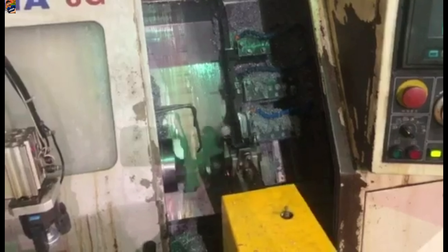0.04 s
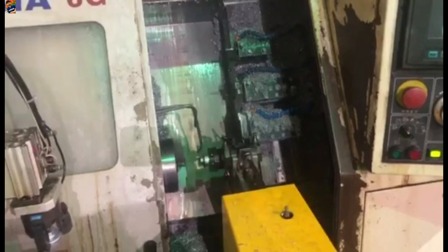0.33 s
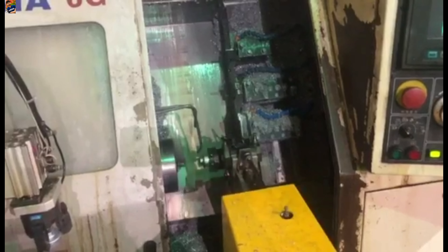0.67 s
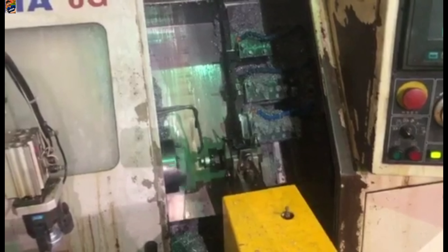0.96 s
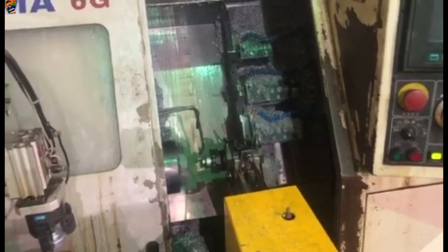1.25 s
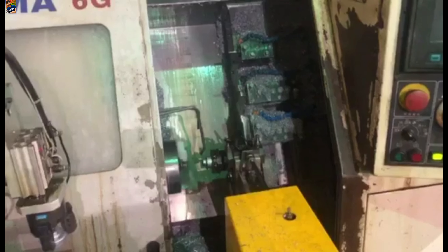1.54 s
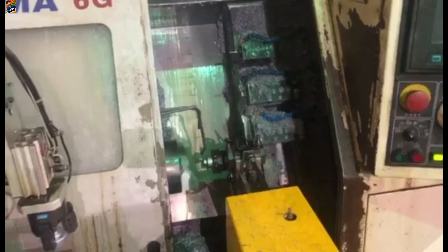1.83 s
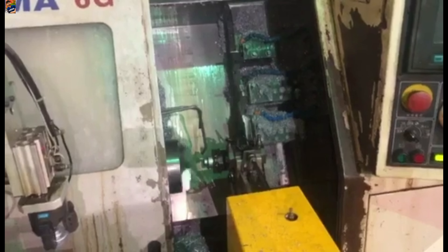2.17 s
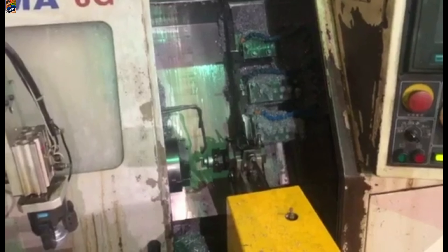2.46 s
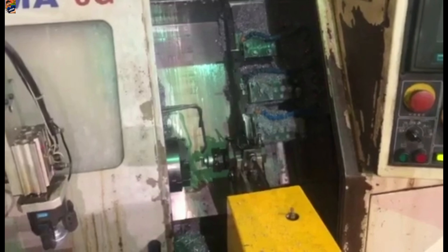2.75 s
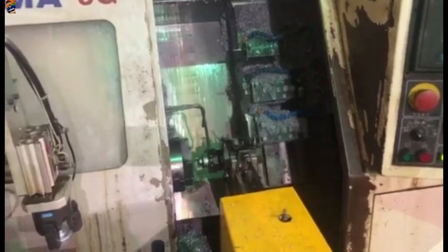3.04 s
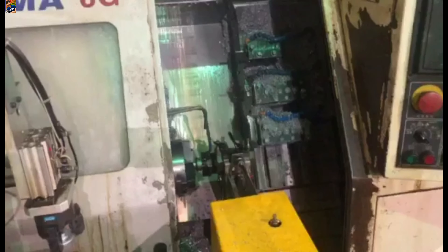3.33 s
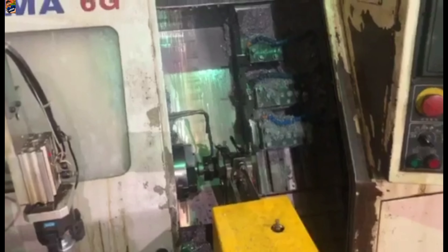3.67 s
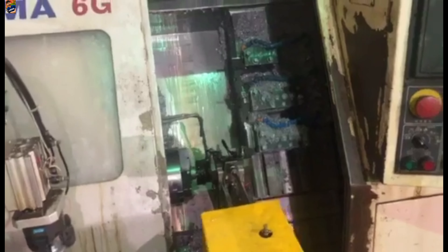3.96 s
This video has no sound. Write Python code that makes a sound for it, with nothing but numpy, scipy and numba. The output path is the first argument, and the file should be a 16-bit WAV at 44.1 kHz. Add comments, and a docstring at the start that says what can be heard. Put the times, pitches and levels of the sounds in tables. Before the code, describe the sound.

A loud, close hiss of air and coolant sprays a spinning lathe chuck, fluttering rapidly over a faint drone. At about 2.2 seconds it cuts off, with a high nozzle whistle fading within half a second. Much quieter motor hum, whine and workshop rush remain, slowly swelling. From about 3 seconds a low rumble grows with a few dull bumps, the strongest near 3.4, continuing until 4 seconds.

```python
"""A jet of air and coolant hisses against the turning chuck of a lathe, fluttering as the jaws pass
and ringing the steel cabin. The valve shuts: the hiss dies away in the workshop, and the nozzle
whistles briefly as the hose empties. Motor hum and drive whine remain, and swell as the automatic
gain control recovers. Near the end a low rumble grows, with a few dull bumps inside the machine."""
import sys
import numpy as np
from scipy import signal
from scipy.fft import rfft, irfft
from scipy.io import wavfile
from scipy.ndimage import uniform_filter1d, map_coordinates
from numba import njit

SR = 44100
rng = np.random.default_rng(int(sys.argv[2]) if len(sys.argv) > 2 else 0)


def bounce(signal):
    """Save signal as a 16-bit WAV file at the path given by the first command-line argument."""
    frames = np.transpose(np.atleast_2d(signal))
    limited = np.clip(frames, -1, 1)
    pcm = np.round(limited * 32767).astype(np.int16)
    wavfile.write(sys.argv[1], SR, pcm)


N = 176400
SHUT_S, SHUT_FALL_S = 2.226, .014  # when the valve shuts, and how fast the flow falls


def undb(db):
    """Turn decibels into a factor to multiply by."""
    return 10 ** (np.asarray(db) / 20)


def level(x, db=0):
    """Scale a signal to an average (rms) level."""
    return x * undb(db) / np.sqrt(np.mean(x ** 2))


def on_log_axis(points, hz):
    """Read between (f/Hz, value) points, giving each octave equal room."""
    freqs, values = np.array(points, float).T
    return np.interp(np.log(hz + 1e-3), np.log(freqs), values)


def bins():
    """The frequencies in the spectrum of the whole sound."""
    return np.arange(N // 2 + 1) * SR / N


def noise(colour):
    """Noise of strength 1; its colour says how strong each frequency is next to the others."""
    spectrum = rfft(rng.standard_normal(N))
    return level(irfft(spectrum * undb(on_log_axis(colour, bins())), N))


def walk(rate):
    """A smooth random wobble of strength 1, changing about rate times a second."""
    spectrum = rfft(rng.standard_normal(N))
    return level(irfft(spectrum / (1 + (bins() / rate) ** 4), N))


def tone(hz):
    """A sine wave that follows a changing pitch."""
    return np.sin(2 * np.pi * np.cumsum(hz) / SR)


def shop_noise():
    """Machinery fills the workshop with a soft, nearly steady rush."""
    # colour of the rush: f/Hz, level/dB
    colour = [(20, -47), (40, -23), (62, -7), (80, -12), (120, -9.5), (190, -7), (260, -7.5), (350, -7.5),
              (470, -5.5), (770, -8.5), (900, -12), (1320, -10), (2440, -16.5), (3600, -16.5), (5200, -19),
              (8600, -17), (9400, -25.5)]
    return undb(-38 + .5 * walk(10)) * noise(colour)


def motor_hum():
    """The motor hums and the drive whines, wavering in pitch and loudness."""
    # motor and drive tones: f/Hz, relative level/dB, flutter/dB
    tones = [(100, -59.5, 1.5), (265, -51, 3), (533, -53.5, 2.5), (592.7, -52.5, 3.5), (791, -56, 3),
             (1071, -64, 2), (1333, -57.5, 1.5), (1610, -63, 1.5), (1840, -69.5, 1), (1980, -67, 2),
             (2110, -60.5, 2), (2640, -58.5, 1), (2670, -54.5, 1), (2977, -64, 2.5), (3688, -61, 1),
             (4544, -58, 1.7)]
    out = 0
    for hz, db, flutter_db in tones:
        drift_hz = 2.98 + 0.002014 * hz  # higher tones wander further
        wave = tone(hz + drift_hz * walk(11.13))
        waver_db = flutter_db * walk(30) + .8 * walk(4)
        out = out + level(wave * undb(waver_db), db + 2)
    return out


def rumble(t):
    """The machine's low rumble swells near the end."""
    # loudness of the rumble: t/s, level/dB
    loudness = [(0, -64), (2.8, -59), (3.15, -54), (3.35, -41), (3.55, -49), (4, -42)]
    # colour of the rumble: f/Hz, level/dB
    colour = [(35, -25.5), (70, -12), (102, 1.5), (170, -7.5), (255, -1.5), (340, -2), (520, -3.5),
              (900, -24.5), (2500, -39.5)]
    times, levels_db = np.array(loudness).T
    return undb(np.interp(t, times, levels_db)) * noise(colour)


def bumps(t):
    """Soft knocks make the housing boom: each swells quickly and dies away."""
    # knocks inside the machine: t/s, f/Hz, level/dB
    knocks = [(3.05, 58, -51), (3.355, 251.5, -41), (3.75, 70.8, -57)]
    rise_s, pitch_wobble = 0.03, 0.0515
    out = 0
    for start, hz, db in knocks:
        age = np.maximum(t - start, 0) / rise_s
        wave = tone(hz * (1 + pitch_wobble * walk(39)))
        boom = level(wave * undb(2 * walk(50)), db)
        out = out + age * np.exp(1 - age) * boom
    return out


def pressure(t):
    """Full flow, then a quick cut when the valve shuts."""
    return np.exp(-np.maximum(t - SHUT_S, 0) / SHUT_FALL_S)


def feed_line(t):
    """The feed line drones for as long as the valve is open."""
    # colour of the drone: f/Hz, level/dB
    colour = [(90, -34), (130, -7.5), (155, 0.5), (180, -5), (230, -19), (297, 0), (345, -15), (390, -4),
              (600, -36)]
    return undb(-42.5) * pressure(t) * noise(colour)


def workshop_echo(x, t):
    """The room answers with a smooth echo whose treble dies first."""
    # time the echo takes to fade by 60 dB: f/Hz, t/s
    fade_times = [(200, 1), (1500, 1), (3500, 0.72), (8000, 0.45)]
    echo_db, delay_s = -11, 0.0091
    octaves_hz = 125 * 2 ** np.arange(8)
    spectrum, tail = rfft(rng.standard_normal(N)), 0
    for hz, share in zip(octaves_hz, np.eye(len(octaves_hz))):
        one_octave = on_log_axis(list(zip(octaves_hz, share)), bins())
        band = irfft(spectrum * one_octave, N)
        tail = tail + band * undb(-60 * t / on_log_axis(fade_times, hz))
    tail = tail * (t > delay_s)
    return undb(echo_db) * signal.fftconvolve(x, tail / np.linalg.norm(tail))[:N]


def cabin(x):
    """The steel cabin rings, lifting some narrow bands of the hiss and lowering others."""
    # the cabin's peaks and dips: f/Hz, width/Hz, lift/dB
    resonances = [(680, 60, -2.5), (1000, 48, 1), (1095, 40, 3.5), (1156, 45, -3), (1670, 150, 2.5),
                  (1910, 83, -3.5), (2020, 35, 0), (2084, 49, 4), (2445, 45, -1.5), (2503, 32, 3.5),
                  (2590, 70, -4), (2690, 47, 2.5), (2861, 22, -1), (3390, 35, -5), (3420, 39, 2.5),
                  (3480, 60, 2), (3625, 50, 0.5), (3940, 42, 3), (3900, 50, 0.5), (4340, 55, 4),
                  (4860, 50, 1), (4954, 64, -9.5), (4930, 61, 2.5), (6900, 130, 1), (7860, 80, 4.5),
                  (7950, 91, 2)]
    lift_db = sum(db / (1 + (2 * (bins() - hz) / width) ** 2) for hz, width, db in resonances)
    return irfft(rfft(x) * undb(lift_db), N)


def nozzle_whistle(t):
    """At low pressure the nozzle sings in unsteady tones, which fade as the hose empties."""
    # the nozzle's tones: f/Hz, pitch wobble/Hz, level/dB
    tones = [(4400, 26.3, -36), (4466, 20, -38), (5220, 14.6, -40), (5200, 16, -35.5), (8765, 25.2, -41.5)]
    rise_s, hold_s, fade_db_per_s, flutter_db = .012, 0.085, 51, 2.2
    since_shut = t - SHUT_S
    rise = np.clip(since_shut / rise_s, 0, 1)
    fade = undb(-fade_db_per_s * np.maximum(since_shut - hold_s, 0))
    out = 0
    for hz, wobble_hz, db in tones:
        wave = tone(hz + wobble_hz * walk(142))
        out = out + level(wave * undb(flutter_db * walk(60)), db)
    return rise * fade * out


def emptying_hose(t):
    """What is left in the hose escapes with a duller, fading hiss."""
    # colour of the last hiss: f/Hz, level/dB
    colour = [(400, -12), (950, -17), (1300, -1.5), (1650, -5.5), (2200, -4.5), (2700, -7), (3500, -11),
              (5000, -4.5), (6000, -20), (7000, -13), (9000, -25)]
    start_db, fade_db_per_s = -23, 89
    fade = undb(start_db - fade_db_per_s * np.maximum(t - SHUT_S, 0))
    return (1 - pressure(t)) * fade * noise(colour)


def shimmer(x):
    """Narrow bands of the hiss flicker at random, giving it a fine, patchy texture."""
    patch_db, patch_hz, patch_s = 3, 80.24, .05  # depth, width and length of a patch
    hz, times, cells = signal.stft(x, SR, nperseg=1024)
    chance = rng.standard_normal((1024, 512))
    grid = np.meshgrid(hz / patch_hz, times / patch_s, indexing="ij")
    patches = map_coordinates(chance, grid, mode="mirror")
    _, hiss = signal.istft(cells * undb(patch_db * patches), SR)
    return level(hiss[:N])


def jet(t):
    """The swirling jet hisses, and its splash swells each time a jaw cuts through it."""
    # colour of the jet in open air: f/Hz, level/dB
    jet_colour = [(120, -34), (400, -4.5), (750, -6.5), (1100, -1), (1600, 0.5), (2200, 4), (3000, 4.5),
                  (4000, 3), (5200, 4), (5800, -7.5), (6400, 2), (7300, 3), (8900, 4), (9500, -23)]
    # colour of the spray breaking on the jaws: f/Hz, level/dB
    splash_colour = [(500, -38), (2000, -10), (2800, -5), (3150, 0), (3600, 2), (4000, -4), (5300, -2.5),
                     (6200, -3.5), (9000, -38.5)]
    jet_db, splash_db, flicker_db = -20, -22.5, 1.11
    jaws_per_s, first_jaw_s, jaw_depth = 14.92, 0.017, .28
    jaws = np.cos(2 * np.pi * jaws_per_s * (t - first_jaw_s))
    uneven = 1 + .2 * walk(7.5)
    swell = np.maximum(1 + jaw_depth * jaws * uneven, 0)
    hiss = undb(jet_db + flicker_db * walk(36)) * shimmer(noise(jet_colour))
    splash = undb(splash_db + flicker_db * walk(32)) * swell * shimmer(noise(splash_colour))
    return (hiss + splash) * pressure(t)


def scene():
    """The hiss in its cabin and room, the whistle and the running machine, in one channel."""
    t = np.arange(N) / SR
    hiss = cabin(jet(t) + emptying_hose(t))
    flow = hiss + workshop_echo(hiss, t) + nozzle_whistle(t) + feed_line(t)
    machine = shop_noise() + motor_hum() + rumble(t) + bumps(t)
    return (flow + machine)[None]


@njit
def follow(strength, current, rise_s, fall_s):
    """Trail behind a changing strength, rising and falling at different speeds."""
    out = np.empty(len(strength))
    for i in range(len(strength)):
        lag_s = rise_s if strength[i] > current else fall_s
        current += (strength[i] - current) / (lag_s * SR)
        out[i] = current
    return out


def record(dry):
    """Gain control turns the loud hiss down and recovers slowly; the highest treble is cut."""
    threshold_db, squeeze, top_hz = -31.5, 0.29, 9200
    strength = np.sqrt(np.abs(uniform_filter1d(dry[0] ** 2, size=441)))  # averaged over 10 ms
    opening = float(np.mean(strength[:SR // 10]))
    heard = follow(strength, opening, rise_s=0.11, fall_s=0.4)
    gain = np.minimum(undb(threshold_db) / heard, 1) ** squeeze
    treble_cut = signal.ellip(10, .2, 80, top_hz, fs=SR, output="sos")
    return signal.sosfilt(treble_cut, dry * gain)


dry = scene()
out = record(dry)
bounce(out)
```